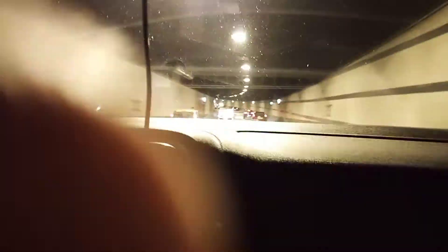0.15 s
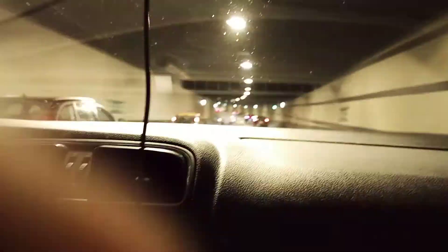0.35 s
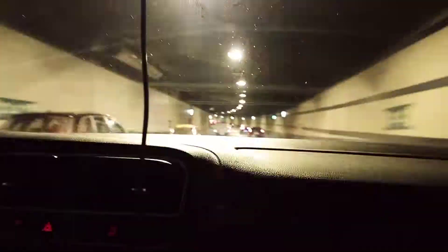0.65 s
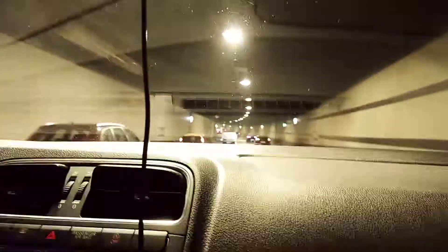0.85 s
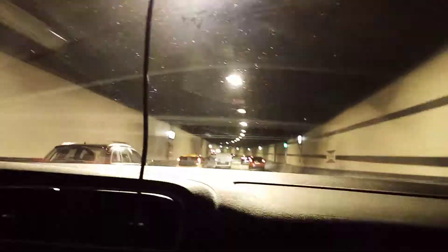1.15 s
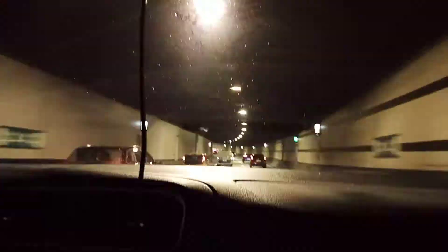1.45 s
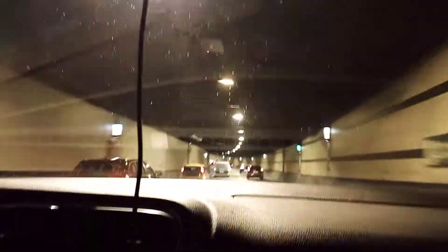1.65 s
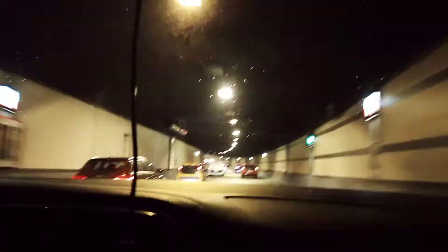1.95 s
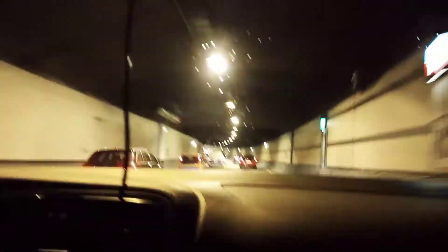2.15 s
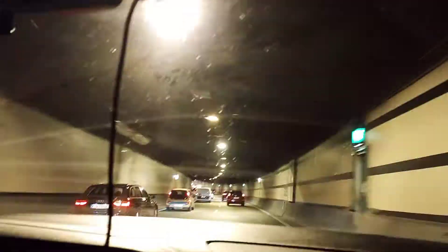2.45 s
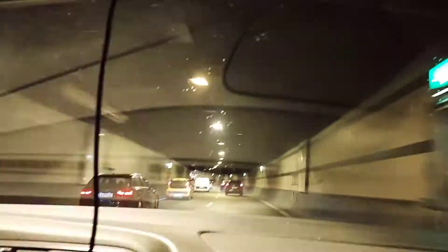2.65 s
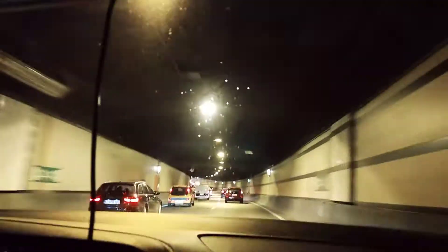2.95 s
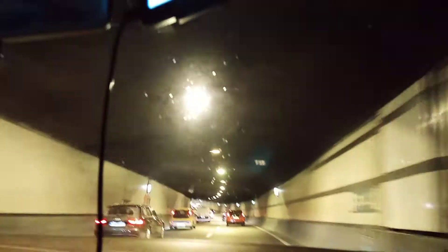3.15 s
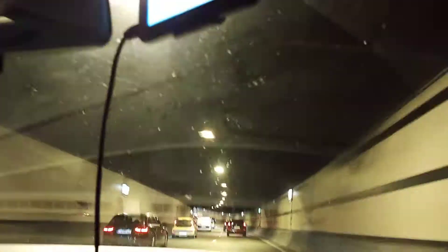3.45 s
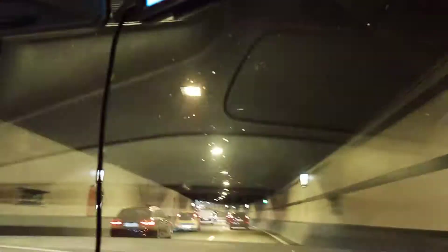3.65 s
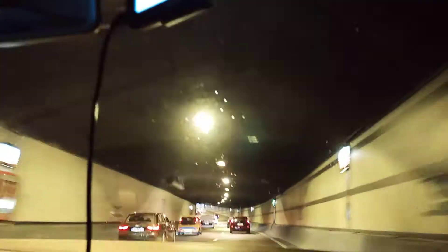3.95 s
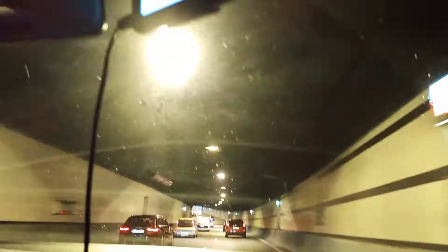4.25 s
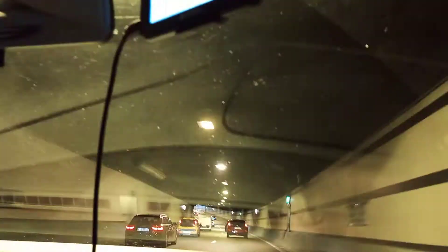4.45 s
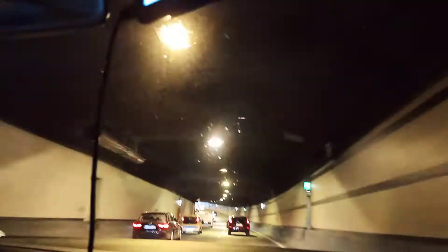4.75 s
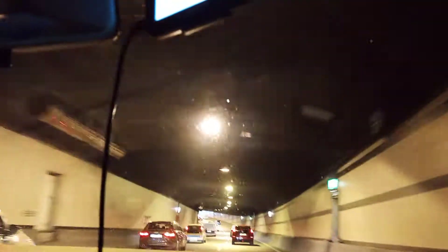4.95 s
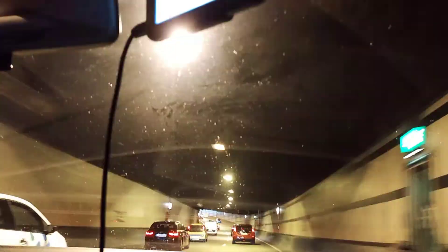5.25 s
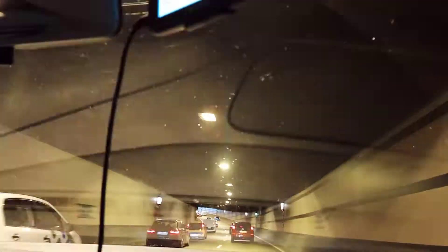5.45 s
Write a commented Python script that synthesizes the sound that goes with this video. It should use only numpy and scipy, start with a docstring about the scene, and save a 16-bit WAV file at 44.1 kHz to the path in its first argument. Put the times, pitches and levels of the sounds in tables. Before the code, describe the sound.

After a quarter second of silence, the ride inside a car in a road tunnel fades up: deep body rumble, soft tyre roar and faint low throbs. Fingers tap and brush the phone, and something hard scrapes it with a short squeal. Small ticks follow, then around three and a half seconds a heavy low knock shudders and ends in a sharp tap. Steady rumble continues, captured by a handheld phone, one channel.

```python
"""Tyres roar, the body shell booms and the air in the tyres rings as a car rolls through a road tunnel.
Filtered noise makes the roar and rumble, noise-driven resonances the booms, sine swells the throbs over
uneven spots. A phone is held inside: fingers tap, tick and brush its case in short swings and noise puffs,
something hard scrapes its modes into ringing, and once the hand knocks it into a lurch, jolts and a shudder.
The microphone opens late, and the ride fades up behind it."""
import sys
import numpy as np
from scipy import signal
from scipy.fft import rfft, irfft, next_fast_len
from scipy.io import wavfile

SR = 44100
rng = np.random.default_rng(int(sys.argv[2]) if len(sys.argv) > 2 else 0)


def put_to_file(sound):
    """Save the sound as 16-bit audio at rate SR, in the file named by the first command-line argument."""
    columns = np.atleast_2d(sound).T  # one column per channel
    safe = np.clip(columns, -1, 1)
    whole_steps = np.round(safe * 32767)
    wavfile.write(sys.argv[1], SR, whole_steps.astype(np.int16))


N = 247445
TIME = np.arange(N) / SR   # s
OPENS_S = .2415   # the microphone opens

# cabin boom, its overtones and the air ring inside the tyres: f/Hz, width/Hz, level against the rumble/dB
BOOMS = [(50.9, 24.4, -9), (102.1, 18.7, -15), (130.4, 9, -16), (251.8, 15.7, -20), (367, 5.3, -30)]


def from_db(db):
    """Gain of a level in dB."""
    return 10 ** (np.asarray(db) / 20)


def rms_one(x):
    """Scaled to rms 1."""
    return x / np.sqrt(np.mean(x ** 2) + 1e-20)


def in_time(rows, outside=None):
    """Columns of a breakpoint curve, sample by sample."""
    s, *columns = np.transpose(rows)
    return [np.interp(TIME, s, column, outside, outside) for column in columns]


def band(x, low_hz, high_hz):
    """Butterworth band-pass."""
    return signal.sosfilt(signal.butter(2, [low_hz, high_hz], "band", fs=SR, output="sos"), x)


def sine(hz, seconds):
    """Sine of peak 1."""
    return np.sin(2 * np.pi * hz * seconds)


def drift(corner_hz):
    """Slow random wander of rms about 1: noise smoothed by two equal poles."""
    step = 40   # samples between the slow values
    r = np.exp(-2 * np.pi * corner_hz * step / SR)
    noise = rng.standard_normal(N // step + 2002)
    slow = signal.lfilter([1], [1, -2 * r, r * r], noise)[2000:]   # settled part
    return np.interp(np.arange(N) / step, np.arange(len(slow)), rms_one(slow))


def resonance(x, hz, width_hz):
    """Two-pole resonance with gain 1 on top."""
    r = np.exp(-np.pi * width_hz / SR)
    zeros = np.array([1, 0, -1]) * (1 - r * r) / 2
    return signal.lfilter(zeros, [1, -2 * r * np.cos(2 * np.pi * hz / SR), r * r], x)


def ringing(x, hz, width_hz):
    """A resonance passed twice: sharp top, dark flanks."""
    return resonance(resonance(x, hz, width_hz), hz, width_hz)


def coloured(spectrum, patchy_db):
    """Noise of a given spectrum; each octave swells partly with the others, partly alone; rms 1."""
    size = next_fast_len(N)
    hz = np.maximum(np.arange(size // 2 + 1) * SR / size, 1)
    points = np.array(spectrum)
    colour_db = np.interp(np.log(hz), np.log(points[:, 0]), points[:, 1], -90, -90)
    shaped = rfft(rng.standard_normal(size)) * from_db(colour_db)
    out, together = 0, drift(2.1)
    for centre in np.arange(np.floor(np.log2(points[0, 0])), np.log2(points[-1, 0]) + 1):
        share = np.clip(1 - abs(np.log2(hz) - centre), 0, 1)   # overlapping octaves that sum to one
        swell_db = patchy_db * (1.7 * together + drift(15.0))
        out = out + irfft(shaped * share, size)[:N] * from_db(swell_db)
    return rms_one(out)


def stroke(start_s, hold_s, db, rise_db_per_s, fall_db_per_s):
    """Gain that climbs to db at start_s, holds, and sinks."""
    rise_db = rise_db_per_s * np.maximum(start_s - TIME, 0)
    fall_db = fall_db_per_s * np.maximum(TIME - start_s - hold_s, 0)
    return from_db(db - rise_db - fall_db)


def road():
    """Broad rumble and roar, plus cabin and tyre resonances driven by the rough surface."""
    # the ride, before its fade-up: t/s, body rumble level/dB, tyre roar level/dB
    ride = [(.24, -28.5, -38.5), (1.5, -27.5, -36.5), (2.2, -28, -35.5), (2.9, -27.5, -35),
            (3.7, -28.5, -35.5), (4.6, -27, -35), (5.61, -28, -36)]
    # relative spectra of body rumble, tyre roar and the slow heave of the body: f/Hz, level per Hz/dB
    rumble_colour = [(12, -32), (20, 3.5), (54, 2), (80, -5), (108, -5), (220, -10.5), (252, -15.5),
                     (308, -23), (372, -21.5), (398, -20.5), (500, -33.5), (650, -54), (1100, -120)]
    roar_colour = [(150, -31), (250, -6.5), (282, -8.5), (366, -11.5), (483, -13.5), (855, -6),
                   (1510, -12.5), (2460, -13.5), (2880, -18), (3600, -30.5), (4510, -35.5), (5000, -43),
                   (7990, -50), (10500, -60), (15700, -52)]
    sway_colour = [(3, -6.5), (6, -0.5), (14, 2), (22, -9), (30, -19)]
    sway_db = -31
    # at opening the ride starts this far down; the gap shrinks with this time constant
    bass_start_db, bass_rise_s = -8.5, 0.47
    roar_start_db, roar_rise_s = -9, 0.23

    rumble_db, roar_db = in_time(ride)
    since = np.maximum(TIME - OPENS_S, 0)
    bass_fade_db = bass_start_db * np.exp(-since / bass_rise_s)
    roar_fade_db = roar_start_db * np.exp(-since / roar_rise_s)

    booms = 0
    for hz, width_hz, db in BOOMS:
        surface = rng.standard_normal(N)
        boom_gain = from_db(db + 2.0 * drift(3.2))
        booms = booms + boom_gain * rms_one(ringing(surface, hz, width_hz))
    rumble = 0.98 * coloured(rumble_colour, patchy_db=0.1) + booms
    sway = from_db(sway_db) * coloured(sway_colour, patchy_db=-2)
    bass = sway + from_db(rumble_db) * rumble
    roar = from_db(roar_db + roar_fade_db) * coloured(roar_colour, patchy_db=0.52)
    return from_db(bass_fade_db) * bass + roar


def throbs():
    """Uneven spots in the road make the cabin boom swell and die within a few cycles."""
    # uneven spots: t/s, level/dB
    spots = [(1.45, -25.5), (2.17, -29), (2.75, -23.5), (3.12, -23), (3.82, -28.5), (4.18, -32),
             (4.66, -26), (5.26, -31)]
    gain = sum(stroke(s, hold_s=0.024, db=db, rise_db_per_s=300, fall_db_per_s=200) for s, db in spots)
    boom_hz, phase = BOOMS[0][0], rng.uniform(0, 2 * np.pi)
    return gain * np.sqrt(2) * np.sin(2 * np.pi * boom_hz * TIME + phase)


def knock():
    """A slow lurch of the whole phone swings out inside a longer, quicker shudder."""
    lurch_s, lurch_hz = 3.478, 23
    quarter_s = 1 / (4 * lurch_hz)
    buzz_db = -14   # upper buzz against the shudder's low band

    lurch = np.sqrt(2) * sine(lurch_hz, TIME - lurch_s)
    lurch_gain = stroke(lurch_s + quarter_s, quarter_s, db=-9.5, rise_db_per_s=900, fall_db_per_s=170)
    low = rms_one(band(rng.standard_normal(N), 40, 105))
    buzz = rms_one(band(rng.standard_normal(N), 156, 386))
    shudder = low + from_db(buzz_db) * buzz
    shudder_gain = stroke(3.41, hold_s=0.15, db=-23, rise_db_per_s=350, fall_db_per_s=200)
    return lurch_gain * lurch + shudder_gain * shudder


def scrape():
    """Dense uneven slips of something hard set the case modes ringing, with a sharp catch near the start."""
    # scrape along the case: t/s, low ring level before the squeal is added/dB
    path = [(.645, -60), (.666, -43), (.688, -46), (.714, -42), (.74, -50), (.79, -43), (.86, -48),
            (.94, -68)]
    # case modes: f/Hz, width/Hz, relative gain within the low or bright group/dB
    case_modes = [(1650, 70, -3), (2160, 80, 2), (2750, 150, -12), (3250, 250, -11), (3600, 300, -12),
                  (5030, 110, -20), (5350, 120, -27), (10200, 200, -19), (10900, 500, -15),
                  (11620, 300, -7), (11890, 90, -1), (11960, 90, -1), (12045, 80, -4), (12250, 200, -8),
                  (13500, 500, -15), (15050, 300, -10), (15600, 400, -8)]
    catch_s, catch_db, catch_width_s = .665, -24.5, 0.0017
    bright_start_db, dulls_db_per_s = -12, 22   # bright against low ring at the catch, and how it sinks
    squeal_hz, waver_hz, squeal_db = 2155, 18, -3   # level against the low ring

    slips = rng.standard_normal(N) * from_db(3.2 * drift(67))

    def ring(high):
        """Sum of the case modes above or below 8 kHz, rms 1."""
        return rms_one(sum(from_db(db) * ringing(slips, hz, width_hz)
                           for hz, width_hz, db in case_modes if (hz > 8000) == high))

    bright, low = ring(True), ring(False)
    slowing = np.clip((TIME - .75) / 0.088, 0, 1)   # as the stroke slows, this mode comes forward
    slow_mode = rms_one(ringing(slips, 11580, 350))
    bright = (1 - .4 * slowing) * bright + 0.44 * slowing * slow_mode
    # the slips lock onto one mode
    squeal_cycles = np.cumsum(squeal_hz + waver_hz * drift(52)) / SR
    low = low + from_db(squeal_db) * np.sqrt(2) * sine(1, squeal_cycles)

    low_db, = in_time(path, outside=-120)
    bright_db = low_db + bright_start_db - dulls_db_per_s * np.clip(TIME - catch_s, 0, 1)
    catch = from_db(catch_db) * np.exp(-.5 * ((TIME - catch_s) / catch_width_s) ** 2)
    squeak = sine(squeal_hz, TIME)
    squeak = squeak + 1.35 * band(rng.standard_normal(N), 2800, 3400)
    squeak = squeak + 0.1 * band(rng.standard_normal(N), 6000, 7500)
    return from_db(bright_db) * bright + from_db(low_db) * low + catch * squeak


def taps_and_jolts():
    """Short, rounded swings of the case: fingertip taps, plus low jolts of the knock and its rebound."""
    # swings: t/s, level before rounding/dB, f/Hz, swings/cycles
    swings_of_case = [(.5908, -20, 600, .6), (.625, -21, 550, .6), (.7314, -19, 450, 1.1),
                      (.944, -25, 220, 1.1), (3.3945, -24, 500, 1.1), (3.405, -16, 90, 2.6),
                      (3.566, -13, 55, .55), (3.8124, -22, 1000, .6), (3.8134, -13, 620, 1.2)]
    out, after = np.zeros(N), TIME[:SR // 20]
    for s, db, hz, swings in swings_of_case:
        cycles = np.minimum(hz * after, swings)
        swing = np.sin(2 * np.pi * cycles) * np.sin(np.pi * cycles / swings) ** 2
        out[round(s * SR):][:len(after)] += from_db(db) * swing
    return out


def ticks():
    """Fingers shifting on the case: short puffs of noise in three bands, sudden in front."""
    # ticks: t/s, top hiss level/dB, middle hiss level/dB, decay to 1/e (at least 0.0004)/s
    shifts = [(.502, -58, -69, .01), (0.554, -56, -66, .01), (.591, -53, -64, .011),
              (0.628, -53, -63, 0.015), (0.73, -62, -65, .004), (.9443, -71, -78, .002),
              (1.1762, -52, -63, 0.0028), (1.258, -55, -63, .003), (1.4601, -53, -70, 0.0033),
              (1.981, -48, -70, 0.0019), (3.396, -47, -48.5, .0065), (3.42, -64, -66, .004),
              (3.4466, -51, -57, 0.0073), (3.454, -48, -48.5, 0.02), (3.503, -45, -56, 0.005),
              (3.526, -61, -58, 0.032), (3.553, -62, -62, .004), (3.572, -55, -64, 0.0049),
              (3.584, -59, -59, 0.007), (3.6097, -59, -62, 0.0088), (3.7, -70, -58, .003),
              (3.8133, -39, -50, 0.0017), (3.8208, -57, -72, .0008), (4.2767, -55, -66, .003)]
    low_db = 9.5   # low hiss against the middle hiss
    after, puffs = TIME[:SR // 10], np.zeros((3, N))
    for s, top_db, middle_db, length_s in shifts:
        levels = from_db([top_db, middle_db, middle_db + low_db])
        decay = np.exp(-(after / max(length_s, .0004)) ** 2)
        puffs[:, round(s * SR):][:, :len(after)] += levels[:, None] * decay
    noise = rng.standard_normal((3, N))
    top = np.diff(band(noise[0], 10500, 20300), prepend=0)   # the microphone favours the very top
    colours = [top, band(noise[1], 6030, 8170), band(noise[2], 2000, 3340)]
    return sum(puff * rms_one(colour) for puff, colour in zip(puffs, colours))


def brush():
    """Skin brushing over the case: soft bright hiss, grainy as skin sticks and slips."""
    # brush strokes: start t/s, hold/s, level before the grain/dB
    strokes = [(.3, .03, -67), (.66, .19, -65), (1.17, .12, -71), (1.36, .08, -72), (1.5, .2, -65),
               (3.4, .2, -71)]
    # relative spectrum of the hiss: f/Hz, level per Hz/dB
    hiss_colour = [(4000, -21), (7000, -11), (10000, -18), (12300, -6), (13500, -6), (15000, 0), (16000, 1)]
    gain = sum(stroke(s, hold_s, db, rise_db_per_s=180, fall_db_per_s=250) for s, hold_s, db in strokes)
    grain = from_db(1.8 * drift(60))
    return gain * grain * coloured(hiss_colour, patchy_db=2.7)


def scene():
    """The ride and the handling, one channel."""
    ride = road() + throbs()
    handling = knock() + scrape() + taps_and_jolts() + ticks() + brush()
    return (ride + handling)[None]


def record(dry):
    """Silent until the microphone opens, with a faint hiss of its own; the top is cut steeply."""
    hiss_db, cutoff_hz = -78.5, 15720
    opened = np.clip((TIME - OPENS_S) / 0.0014, 0, 1)
    hiss = from_db(hiss_db) * rms_one(band(rng.standard_normal(N), 3500, 8400))
    top_cut = signal.ellip(12, .5, 60, cutoff_hz, fs=SR, output="sos")
    return signal.sosfilt(top_cut, (dry + hiss) * opened)


dry = scene()
out = record(dry)
put_to_file(out)
```